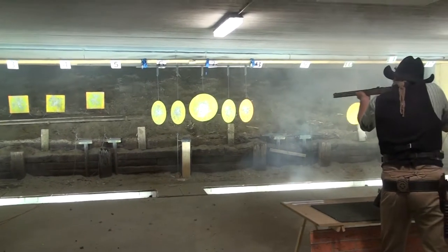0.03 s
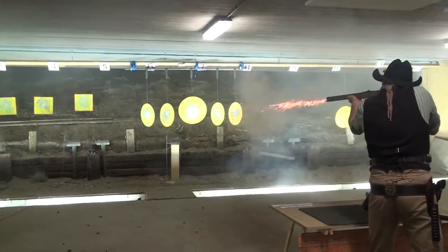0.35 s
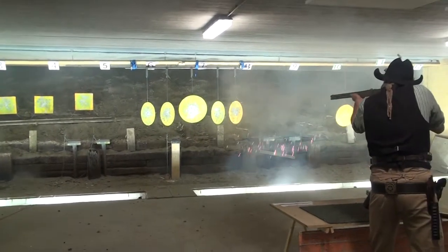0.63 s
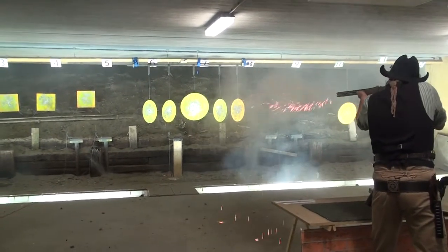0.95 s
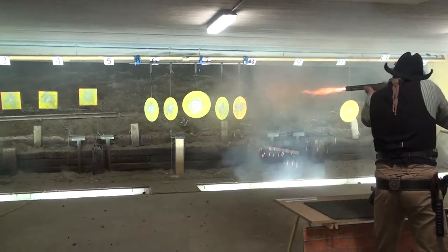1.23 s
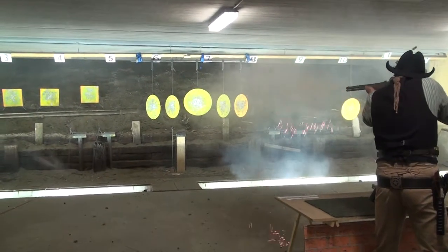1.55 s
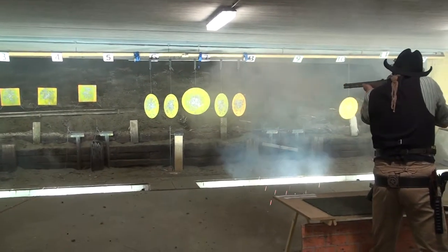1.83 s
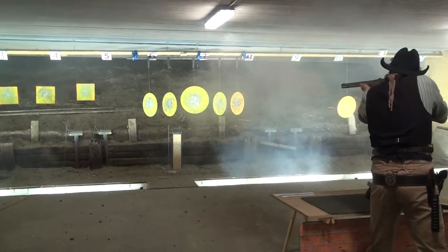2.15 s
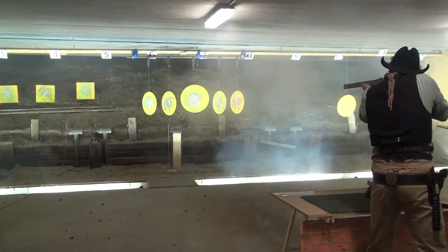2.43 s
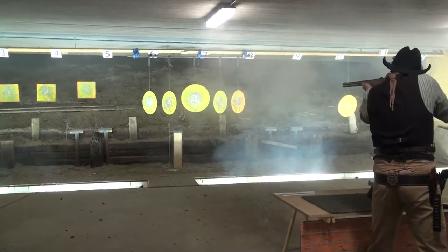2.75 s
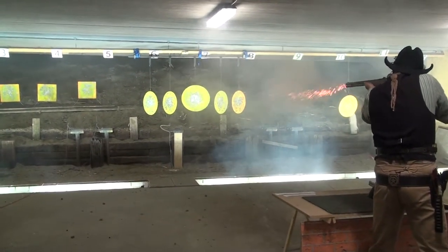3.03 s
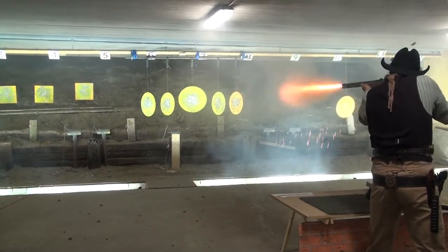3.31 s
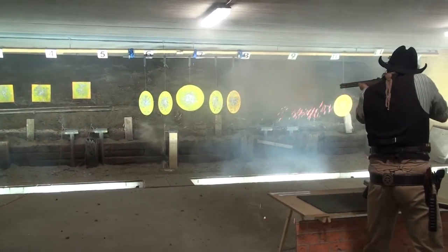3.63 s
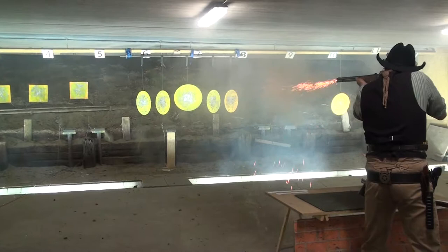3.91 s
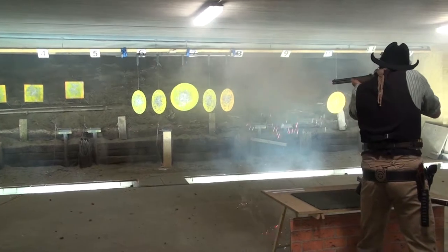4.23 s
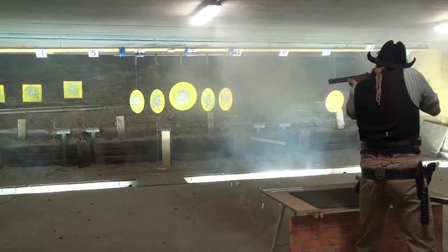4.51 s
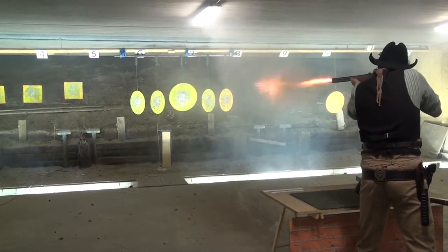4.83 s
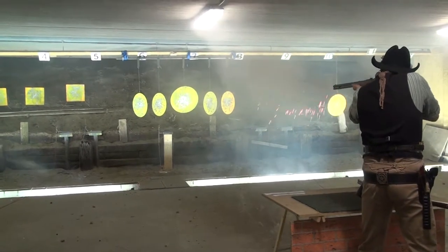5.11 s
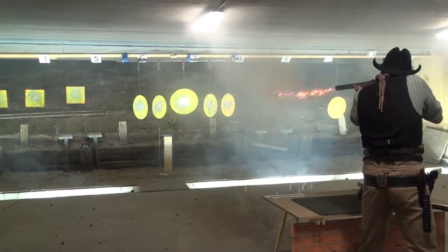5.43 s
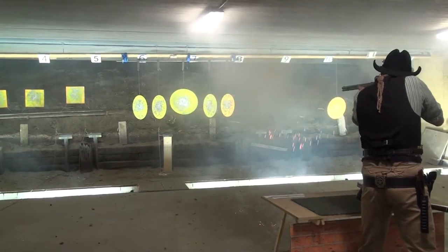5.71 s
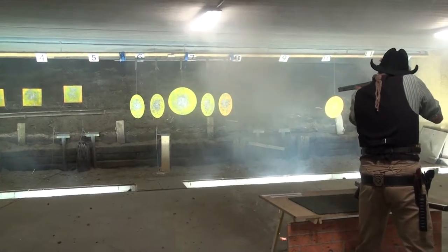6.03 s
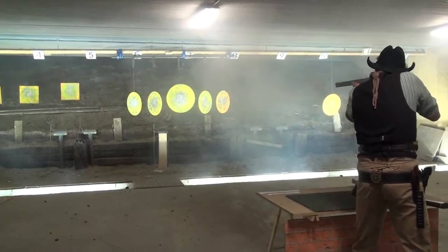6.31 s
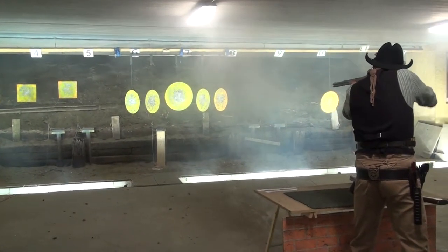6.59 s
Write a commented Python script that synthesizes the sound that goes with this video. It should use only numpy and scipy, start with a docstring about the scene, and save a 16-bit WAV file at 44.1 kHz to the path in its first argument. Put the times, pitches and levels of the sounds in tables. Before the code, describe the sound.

Eight loud rifle shots echo in an indoor shooting range, in groups of three, three and two. After every blast a hanging steel target clangs and rings, its pitch varying from plate to plate. Quiet metallic lever clicks and a faint tinkling case follow the first group; more clicks and two dull wooden knocks follow the last. Fans hum softly throughout, and the bangs sound squashed by the microphone.

```python
"""Eight black-powder shots from a lever-action rifle in a long concrete indoor range.
Each blast fills the hall; a moment later the bullet slaps a hanging steel plate, which rings on,
and fragments set a neighbouring plate ringing. The rifle's steel parts slide and click, a spent
brass case tinkles on the floor, and the bench is knocked twice. Ventilation hums underneath,
and a limiter (an automatic volume control) flattens every bang."""
import sys
import numpy as np
from scipy import signal
from scipy.io import wavfile
from scipy.ndimage import uniform_filter1d

SR = 44100
rng = np.random.default_rng(int(sys.argv[2]) if len(sys.argv) > 2 else 0)


def master(y):
    """Save y as 16-bit WAV."""
    cut = np.clip(np.atleast_2d(y).T, -1, 1)
    pcm = np.round(cut * 32767)  # scale
    wavfile.write(sys.argv[1], SR, pcm.astype(np.int16))


N = 298116
TIME = np.arange(N) / SR
BAND_EDGES_HZ = np.geomspace(25, 18000, 21)

# Levels are relative. A "t60" is the time to fade by 60 dB; a "mode" is a tone an object rings at.
# how the hall's echo dies away: (frequency [Hz], early t60 [s], late t60 [s])
HALL_DECAY = [(50, 0.99, 3.8), (151, 0.98, 2.77), (510, 0.54, 1.66), (1870, 0.44, 1.255),
              (4450, 0.57, 1.166), (7850, 0.43, 0.68), (12300, 0.29, 0.51), (15930, 0.64, .3)]
# low tones between floor, ceiling and walls: (frequency [Hz], level [dB], t60 [s])
BOOM_MODES = [(131, -41.5, 2.12), (159.4, -42.5, 1.3), (195, -46, 1.7)]
# stereo width: (frequency [Hz], level of what differs between the ears against what they share [dB])
STEREO_WIDTH = [(40, -10), (130, -19.5), (260, -10), (600, -8), (2000, -9), (8000, -11.5), (10000, -16),
                (12000, -18.5)]
# rush of air: (frequency [Hz], level [dB])
AIR_SPECTRUM = [(15, -36), (25, -12.5), (84, -30.5), (149, -9.5), (427, -20.5), (962, -29), (4490, -37.5),
                (4870, -31), (5430, -40.5), (16000, -51)]
# hum of the fans: (frequency [Hz], level [dB], phase between the ears [rad])
FAN_TONES = [(27, -76.5, .5), (70, -60, .4), (97, -60, 0.3), (143, -72.5, 0.52)]
# dull knocks on the firing bench: (time [s], level [dB])
BENCH_KNOCKS = [(6.571, -48), (6.598, -51.5)]
# thud of a knock: (frequency [Hz], level [dB])
KNOCK_SPECTRUM = [(30, -17), (200, -1), (500, 3.5), (1100, 0.5), (1800, -6), (2800, -7), (5000, -15),
                  (9000, -14), (16000, -43)]
# hollow ring of the bench top: (frequency [Hz], level [dB], t60 [s])
BENCH_TOP_MODES = [(635, -7, 0.21), (943, -3, 0.17), (1760, -11, .15)]
# a spent case skitters on the floor: (time [s], length [s], level [dB])
CASE_DROPS = [(2.22, .6, -72)]
# ring of a brass case: (frequency [Hz], level [dB], t60 [s])
BRASS_MODES = [(4980, 0, .35), (11100, -7, .25), (15300, -2, .12)]
# lever and bolt slide: (time [s], length [s], level [dB])
LEVER_SLIDES = [(0.06, 0.037, -63), (2.643, 0.042, -54.5), (5.868, 0.054, -62)]
# lever, bolt and hammer make contact: (time [s], level [dB], hardness as treble boost [dB])
STEEL_CLICKS = [(1.8055, -56, 10), (1.8924, -60, 4), (2.073, -61.5, 3.5), (2.2123, -50.5, 5),
                (2.353, -56, 6.5), (2.4777, -62.5, 9), (2.7666, -54.5, 7), (5.8785, -59.5, 11),
                (6.1787, -52, -6), (6.3304, -52, 4.5), (6.523, -62.5, 4.5), (6.701, -66.5, -3),
                (6.723, -59, -8), (6.742, -69, 8)]
# steel rubbing or snapping on steel: (frequency [Hz], level [dB])
STEEL_SPECTRUM = [(30, -7), (1000, -8), (2300, -8.5), (3000, 0), (4000, -5.5), (7500, -6), (10000, -7),
                  (16000, -32.5)]
# ring of the rifle's steel body and its cases: (frequency [Hz], level [dB], t60 [s])
RIFLE_MODES = [(2600, -8, .06), (2950, -4, .11), (3120, -7, .06), (4980, -21, .5), (7400, -11, .03),
               (11100, -37, .25), (15300, -24, .1)]
# ring of each steel target, by name: (frequency [Hz], level [dB], t60 [s])
PLATE_MODES = { "first square": [(610, -2, 1.2), (629, -2, 1.2), (1571, 6, 1.1), (2162, 0, 1.1),
               (2950, -2, 1.1), (3748, -2, 1.3), (4686, 3, 1.2), (5598, 1, 1.2), (6815, 0, .7),
               (7690, -11, .8), (7860, -10, .8)], "second square": [(612, -3, 1.1), (632, -3, 1.1),
               (1563, 1, 1.2), (2159, 4, 1.1), (2926, 0, 1.2), (3682, -1, 1.2), (4532, -4, 1.1),
               (5589, -3, 1.1), (6589, 0, 1.0), (7525, -12, .8)], "right": [(545, -2, 1.3), (880, 6, 2.05),
               (1343, 5, 1.5), (1947, 3, 1.3), (2590, 1, 1.6), (2622, -2, 1.4), (3340, -2, 1.4),
               (3940, -4, 1.0), (4263, 0, 1.5), (5189, -4, 1.2), (6330, -3, 1.2)], "large": [(549, 2, 1.1),
               (625, 0, 1.2), (850, 0, 1.2), (1205, 4, 1.2), (1896, -1, 1.4), (2145, 3, 1.1),
               (2502, 1, 1.3), (2691, -4, 1.1), (3123, 4, 1.3), (3316, -1, 1.1), (3832, 1, 1.1),
               (4575, -3, 1.1), (5372, -4, 1.2)], "left": [(551, 1, 1.4), (848, 2.5, 1.2), (1342, 4.5, 1.7),
               (1636, -3, 1.1), (1904, 5, 1.7), (2499, 4, 1.3), (3143, -4, 1.4), (3362, -3, 1.4),
               (4166, -6, 1.2), (4263, -2, 1.2), (5050, -6, 1.1), (7450, -11, .7)], "outer": [(528, 3, 1.2),
               (882, 3, 1.0), (1344, 2, 1.6), (1906, -1, 1.5), (2153, -5, 1.1), (2594, 1, 1.2),
               (3337, -1, 1.3), (4166, -6, 1.3), (5189, -4, 1.3), (6201, -1, 1.1), (8580, -13, .9)],
               "inner": [(530, 1, 1.2), (880, 0, 1.2), (1369, 0, 1.2), (1908, 4, 1.0), (1948, -3, 1.0),
               (2497, -2, 1.4), (2614, -4, 1.4), (3345, 2, 1.2), (3434, -5, 1.0), (4177, 0, 1.1),
               (5049, -8, 1.1), (6190, -2, .9)]}
# name of the plate that is hit -> name of the plate that catches the fragments
NEIGHBOUR_PLATE = {"first square": "second square", "second square": "first square", "right": "large",
                   "large": "outer", "left": "large", "outer": "inner", "inner": "outer"}
# crash of a bullet on steel, also used for the muzzle's crack: (frequency [Hz], level [dB])
CRASH_SPECTRUM = [(30, -32.5), (250, -21), (520, 1.5), (900, -2), (1500, 0.5), (2500, 2), (4000, -6),
                  (7000, -6.5), (11000, -11.5), (16000, -30)]
# hollow smack of a plate as it jumps: (frequency [Hz], level [dB])
SMACK_SPECTRUM = [(30, -41.5), (250, -13.5), (480, -6), (620, 0), (900, -9.5), (1400, -6.5), (2500, -14.5),
                  (5000, -26), (16000, -39)]
# bang of the powder: (frequency [Hz], level [dB])
BLAST_SPECTRUM = [(30, -8.5), (70, -5.5), (140, -0.5), (350, -0.5), (700, 4.5), (1500, 0.5), (3000, 0),
                  (4500, -1.5), (6500, -1.5), (9000, -6), (12000, -7), (16000, -20)]
# the shots: (time [s], blast level [dB], delay for the bullet to fly out and its sound to return [s],
# hit level [dB], plate name, level of the fragments on its neighbour [dB])
RIFLE_SHOTS = [(0.2261, 1.5, .032, 3, "first square", -25.5),
               (0.7578, 0, 0.034, 3.5, "second square", -13.5), (1.1809, 1, 0.038, 2, "right", -9.5),
               (2.8906, 1, 0.038, 3, "large", -15), (3.3380, 1.5, 0.039, 0, "left", -5),
               (3.8223, -1, .042, 0, "outer", -3), (4.823, .5, 0.044, 0.1, "inner", -3.5),
               (5.2984, 0, 0.045, -1, "left", -12)]


def from_db(db):
    """Turn decibels into a number to multiply a sound by."""
    return 10 ** (np.asarray(db) / 20)


def at_hz(table, hz, column=1):
    """Read a table at any frequency, blending between rows on a scale of octaves."""
    rows = np.array(table)
    return np.interp(np.log(hz), np.log(rows[:, 0]), rows[:, column])


def fade(t, t60):
    """A natural fade that is 60 dB down after t60 seconds."""
    return np.exp(-np.log(1000) * t / t60)


def add(out, start_s, sound):
    """Mix a sound into out at its start time."""
    at = round(start_s * SR)
    out[:, at:at + sound.shape[-1]] += sound[..., :max(N - at, 0)]


def noise(spectrum, t, envelope=lambda hz: 1):
    """Stereo noise built from half-octave bands; the envelope lets each band fade in its own way."""
    white, out, power = rng.standard_normal((2, 2, len(t))), 0, 0
    for k, (low, high) in enumerate(zip(BAND_EDGES_HZ, BAND_EDGES_HZ[1:])):
        hz = np.sqrt(low * high)
        band = signal.butter(2, [low, high], "band", fs=SR, output="sos")
        mid, side = signal.sosfilt(band, white[k % 2])
        stereo = mid + from_db(at_hz(STEREO_WIDTH, hz)) * side * [[1], [-1]]
        gain = from_db(at_hz(spectrum, hz))
        out = out + gain * envelope(hz) * stereo
        power += gain ** 2 * 2 * (high - low) / SR
    return out / np.sqrt(power)


def ring(modes, t):
    """A struck object rings as a sum of fading pure tones."""
    return sum(from_db(db) * fade(t, t60) * np.sin(2 * np.pi * hz * t) for hz, db, t60 in modes)


def scatter(t, rate_hz, size=512):
    """Many reflections add up to a random drift in strength and phase, held as complex numbers."""
    steps = (rng.standard_normal(size) + 1j * rng.standard_normal(size)) / np.sqrt(2)
    return np.interp(t * rate_hz, np.arange(size), steps)


def wavering_ring(modes, diffuse_db, side_db, waver_hz, settle_t60=7.4, size=72000):
    """Ringing heard through the hall: reflections make each tone waver as they arrive."""
    t, out = TIME[:size], 0
    unrest = fade(t, settle_t60)
    for hz, db, t60 in modes:
        mid = from_db(diffuse_db) * scatter(t, waver_hz) * unrest
        side = from_db(side_db) * scatter(t, waver_hz) * [[1], [-1]]
        tone = np.exp(2j * np.pi * (hz * t + rng.random()))
        out = out + from_db(db) * fade(t, t60) * ((1 + mid + side) * tone).real
    return out


def hall_burst(spectrum, late_db, size=80000):
    """A loud burst in the hall fades quickly near its source, then slowly down the lanes."""
    t = TIME[:size]

    def envelope(hz):
        early = fade(t, at_hz(HALL_DECAY, hz))
        late = from_db(late_db) * fade(t, at_hz(HALL_DECAY, hz, column=2))
        return np.hypot(early, late)
    return noise(spectrum, t, envelope)


def tap(spectrum, t, t60, room_db):
    """A small impact: a short puff of noise with a little of the hall's echo."""
    return noise(spectrum, t, lambda hz: fade(t, t60) + from_db(room_db) * fade(t, at_hz(HALL_DECAY, hz)))


def ventilation(air_db=-64, ease_db_per_s=.5):
    """Fans hum over a soft rush of air, slowly getting quieter."""
    hum = 0
    for hz, db, apart in FAN_TONES:
        phase = 2 * np.pi * (hz * TIME + rng.random()) + apart * np.array([[.5], [-.5]])
        hum = hum + np.sqrt(2) * from_db(db) * np.sin(phase)
    air = from_db(air_db) * noise(AIR_SPECTRUM, TIME)
    return (hum + air) * from_db(ease_db_per_s * (TIME.mean() - TIME))


def bench_knocks(hollow_db=-6):
    """Short woody bumps make the bench top ring."""
    out, t = np.zeros((2, N)), TIME[:22000]
    for start_s, db in BENCH_KNOCKS:
        add(out, start_s, from_db(db) * tap(KNOCK_SPECTRUM, t, t60=0.016, room_db=-10))
        add(out, start_s, from_db(db + hollow_db) * ring(BENCH_TOP_MODES, t))
    return out


def spent_case(spread_db=3, touches=6):
    """A brass case touches the floor at uneven intervals and tinkles differently each time."""
    out, t = np.zeros((2, N)), TIME[:18000]
    for start_s, length_s, case_db in CASE_DROPS:
        for touch in range(touches):
            modes = [(hz, db + spread_db * rng.standard_normal(), t60) for hz, db, t60 in BRASS_MODES]
            touch_s = start_s + length_s * (touch + .5 * rng.random()) / touches
            add(out, touch_s, from_db(case_db) * ring(modes, t))
    return out


def lever_slides(rise_s=0.024, t60=.33):
    """Steel rasps on steel as lever and bolt move: each slide swells, holds and dies away."""
    rub = 0
    for start_s, length_s, db in LEVER_SLIDES:
        swell = np.clip((TIME - start_s) / rise_s, 0, 1)
        since_end = np.maximum(TIME - start_s - length_s, 0)
        rub = rub + from_db(db) * swell * fade(since_end, t60)
    return rub * noise(STEEL_SPECTRUM, TIME)


def steel_clicks(treble_hz=4000, clink_loss=.7, echo_s=0.014, echo_db=-6, trip_loss_db=2.5):
    """Steel parts snap home with a short ring; the treble echoes twice between ceiling and floor."""
    out, t = np.zeros((2, N)), TIME[:22000]
    lowpass = signal.butter(1, treble_hz, fs=SR, output="sos")
    for start_s, db, hard_db in STEEL_CLICKS:
        snap = tap(STEEL_SPECTRUM, t, t60=0.027, room_db=-15)
        clink = wavering_ring(RIFLE_MODES, diffuse_db=-2.5, side_db=-12, waver_hz=60, size=len(t))
        click = snap + from_db(-clink_loss * hard_db) * clink   # hard contacts snap, soft ones clink
        dull = signal.sosfilt(lowpass, click)
        bright = from_db(hard_db) * (click - dull)
        add(out, start_s, from_db(db) * (dull + bright))
        for trip in range(2):
            echo = from_db(db + echo_db - trip_loss_db * trip) * bright
            add(out, start_s + (trip + 1) * echo_s, echo)
    return out


def plate_shimmer(low_hz=3400, high_hz=9500, db_per_octave=-7, count=14):
    """Faint high tones of a plate, different for every point of impact; higher ones die sooner."""
    octaves = rng.random(count) * np.log2(high_hz / low_hz)
    modes = [(low_hz * 2 ** up, db_per_octave * up, 0.56 / (1 + up / 4)) for up in octaves]
    return ring(modes, TIME[:44000])


def plate_ring(modes, rise_s=0.035, swing_db=4, swing_t60=0.59, db_per_octave=-1.13, hanger_t60=9.8):
    """A struck plate swells, soon loses its first wide swing, then sings on, damped by its hanger."""
    tilted = [(hz, db + db_per_octave * np.log2(hz / 2000), t60) for hz, db, t60 in modes]
    song = wavering_ring(tilted, diffuse_db=2, side_db=-3.5, waver_hz=32.14)
    t = TIME[:song.shape[1]]
    swell = 1 - np.exp(-t / rise_s)
    swing = 1 + from_db(swing_db) * fade(t, swing_t60)
    return song * swell * swing * fade(t, hanger_t60)


def bullet_slap(crash_rise_s=0.019, smack_db=1, smack_t60=0.096, smack_rise_s=0.0034):
    """Lead splashes on steel: the plate jumps with a hollow smack and the crash swells up the hall."""
    crash = hall_burst(CRASH_SPECTRUM, late_db=-11.5)
    out = crash * (1 - np.exp(-TIME[:crash.shape[1]] / crash_rise_s))
    t = TIME[:SR // 2]
    smack = noise(SMACK_SPECTRUM, t) * fade(t, smack_t60) * (1 - np.exp(-t / smack_rise_s))
    add(out, 0, from_db(smack_db) * smack)
    return out


def muzzle_blast(crack_s, crack_db=-12, bright_hz=1200, bright_t60=0.027, grain_db=-2.5):
    """A brief, thin crack comes first; then the full bang fills the hall."""
    bang = hall_burst(BLAST_SPECTRUM, late_db=-9)
    t = TIME[:bang.shape[1]]
    # the first reflections are bright, separate shock waves that merge into a smooth tail
    highpass = signal.butter(1, bright_hz, "high", fs=SR, output="sos")
    bright = fade(t, bright_t60) * signal.sosfilt(highpass, bang)
    shocks = from_db(grain_db * fade(t, t60=0.94) * scatter(t, rate_hz=2500, size=8192).real)
    crack = from_db(crack_db) * noise(CRASH_SPECTRUM, TIME[:round(crack_s * SR)])
    return np.hstack([crack, shocks * (bang + bright)])


def rifle_shots(crack_s=0.0066, blast_db=-20, slap_db=-17, ring_db=-39, shimmer_db=-46.5, graze_db=-37):
    """Each blast makes the hall boom, then the plates answer; a harder hit slaps and rings louder."""
    out = np.zeros((2, N))
    for start_s, charge_db, delay_s, hit_db, target, fragments_db in RIFLE_SHOTS:
        add(out, start_s - crack_s, from_db(blast_db + charge_db) * muzzle_blast(crack_s))
        boom = wavering_ring(BOOM_MODES, diffuse_db=-9.5, side_db=-6.5, waver_hz=9)
        add(out, start_s, from_db(charge_db) * boom)
        hit_s = start_s + delay_s
        add(out, hit_s, from_db(slap_db + hit_db) * bullet_slap())
        add(out, hit_s, from_db(ring_db + hit_db) * plate_ring(PLATE_MODES[target]))
        add(out, hit_s, from_db(shimmer_db + hit_db) * plate_shimmer())
        neighbour = plate_ring(PLATE_MODES[NEIGHBOUR_PLATE[target]])
        add(out, hit_s, from_db(graze_db + fragments_db) * neighbour)
    return out


def scene():
    """All the sounds together, a little louder on the left."""
    mix = rifle_shots() + steel_clicks() + lever_slides() + spent_case() + bench_knocks() + ventilation()
    return mix * from_db([[.3], [-.3]])


def record(dry, limit_db=-18, release_db_per_s=110, ceiling=0.33, cutoff_hz=16100):
    """A limiter turns loud moments down and recovers; peaks are rounded and the highest treble is cut."""
    power = uniform_filter1d(np.mean(dry ** 2, axis=0), size=130)
    level_db = 10 * np.log10(np.maximum(power, 1e-12))
    over_db = np.maximum(level_db - limit_db, 0)
    # the volume drops at once, then climbs back at a steady rate
    recovery_db = release_db_per_s * TIME
    duck_db = np.maximum.accumulate(over_db + recovery_db) - recovery_db
    rounded = ceiling * np.tanh(dry * from_db(-duck_db) / ceiling)
    lowpass = signal.ellip(12, .1, 80, cutoff_hz, fs=SR, output="sos")
    return signal.sosfilt(lowpass, rounded)


dry = scene()
out = record(dry)
master(out)
```